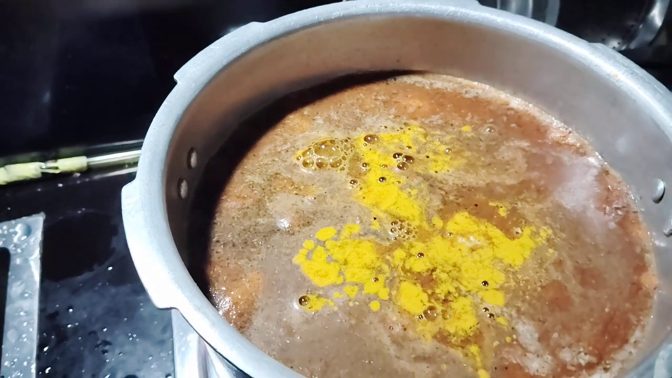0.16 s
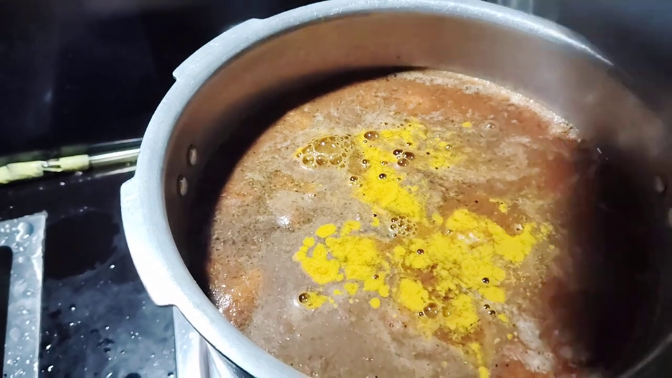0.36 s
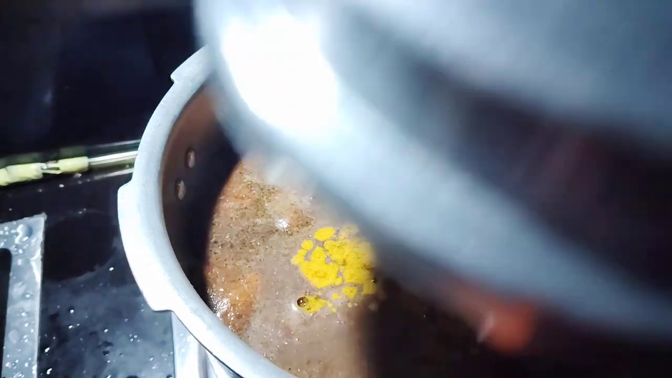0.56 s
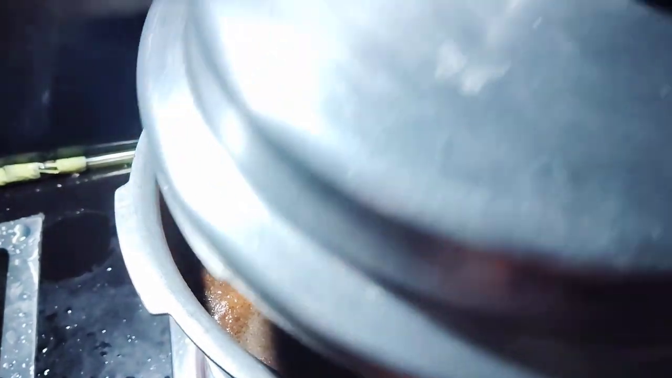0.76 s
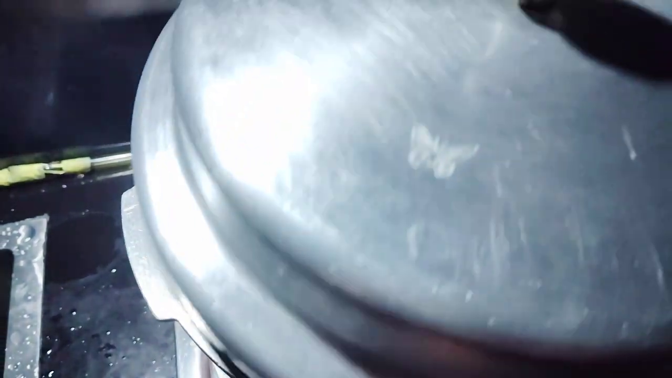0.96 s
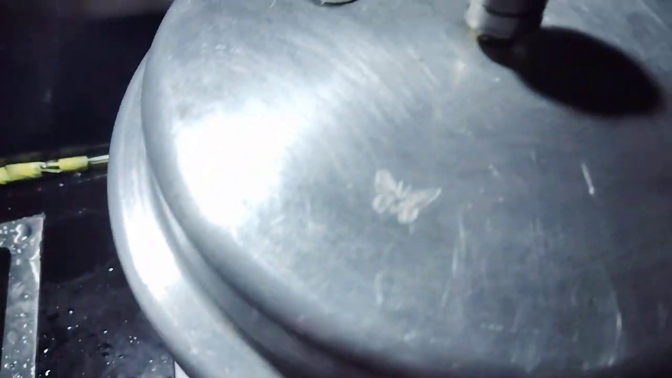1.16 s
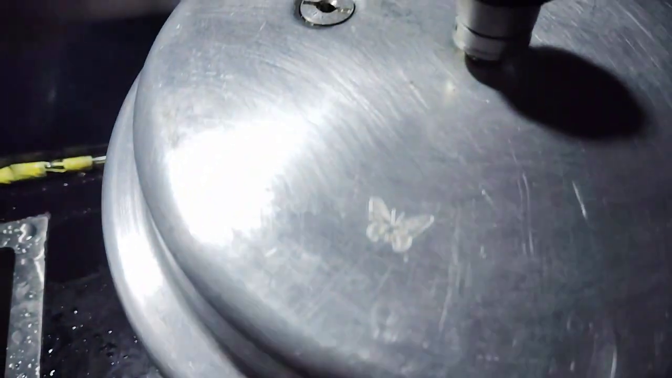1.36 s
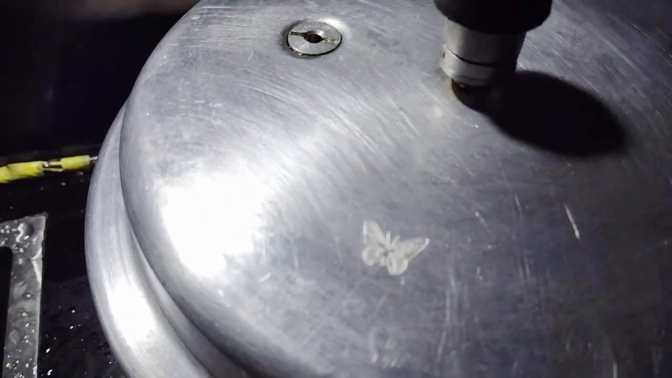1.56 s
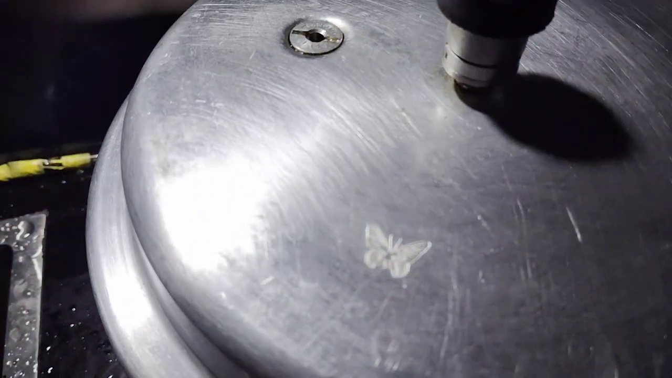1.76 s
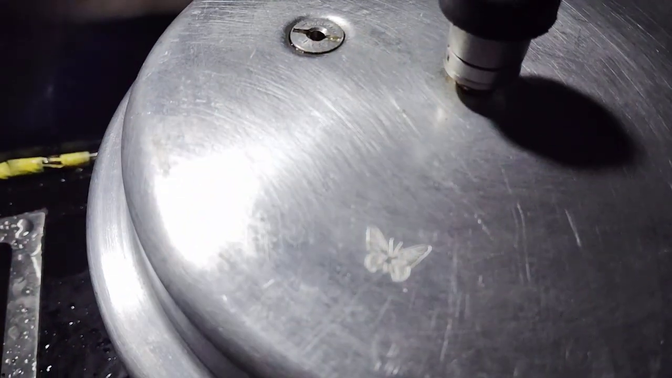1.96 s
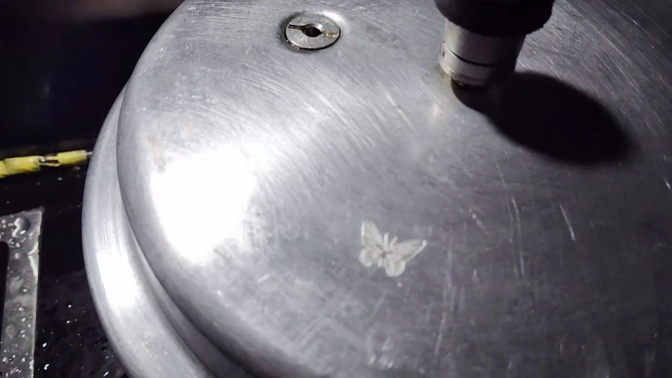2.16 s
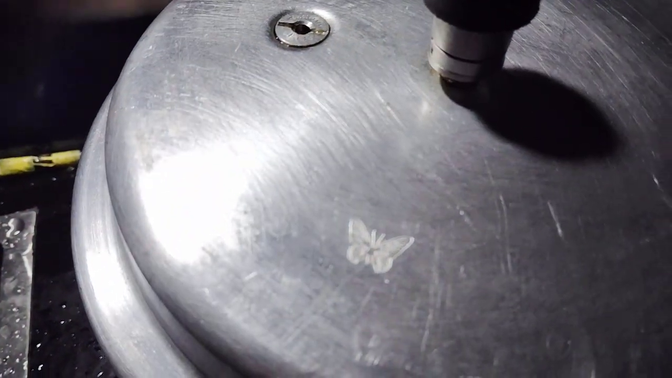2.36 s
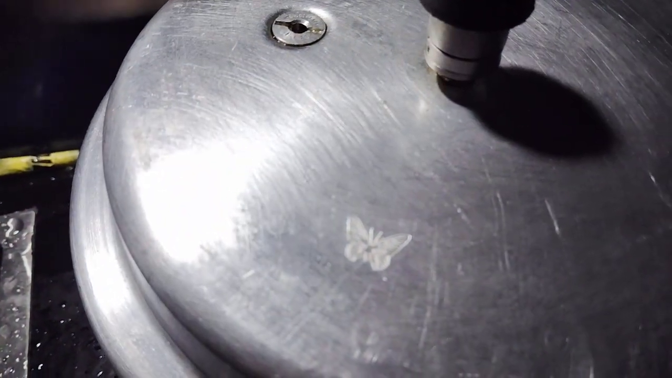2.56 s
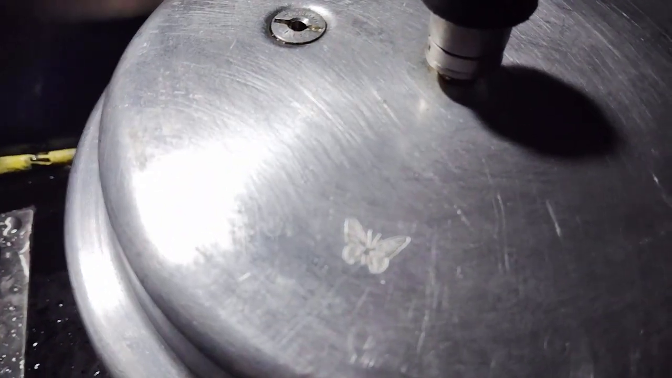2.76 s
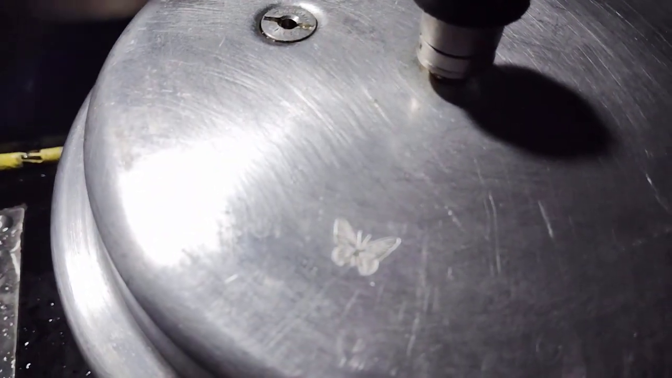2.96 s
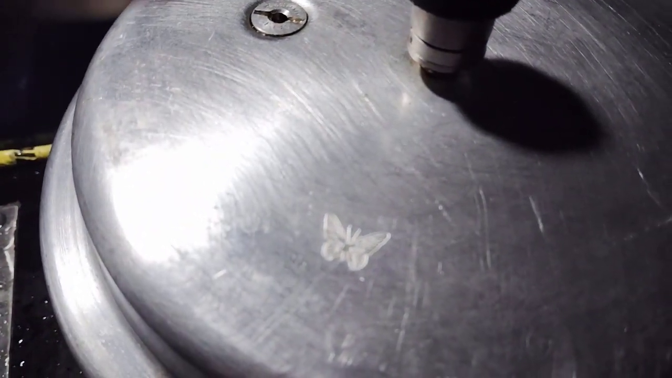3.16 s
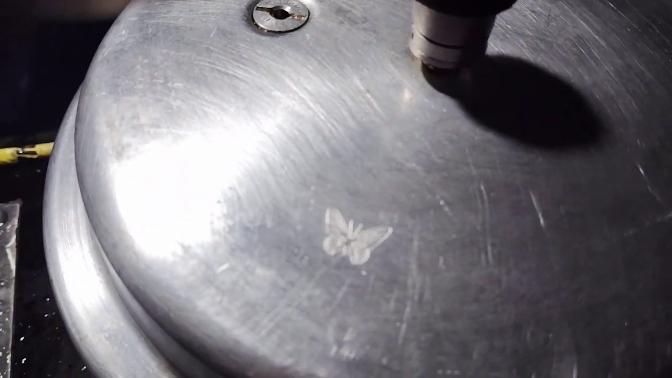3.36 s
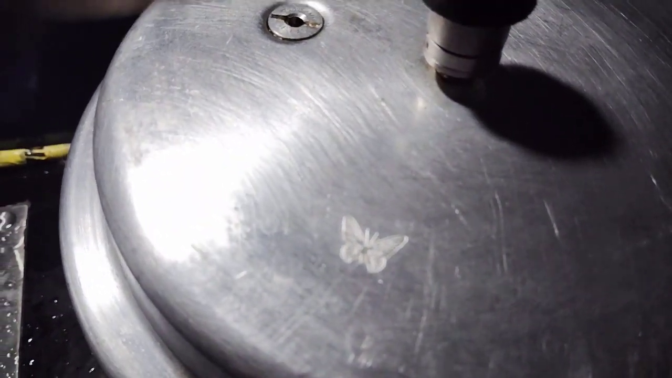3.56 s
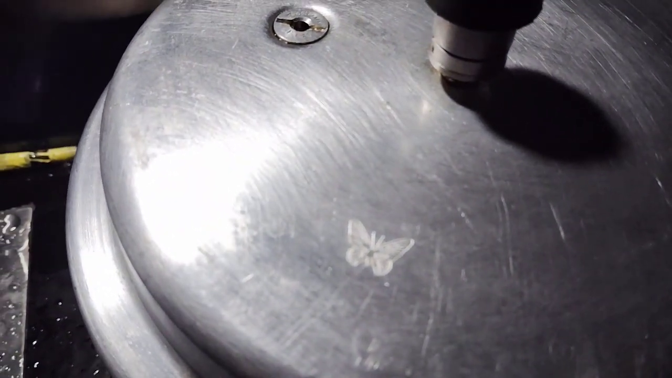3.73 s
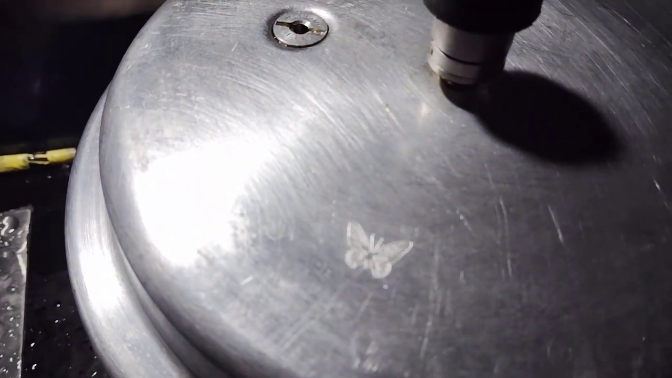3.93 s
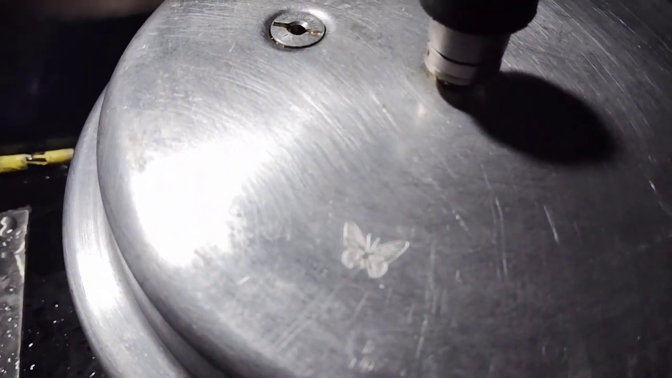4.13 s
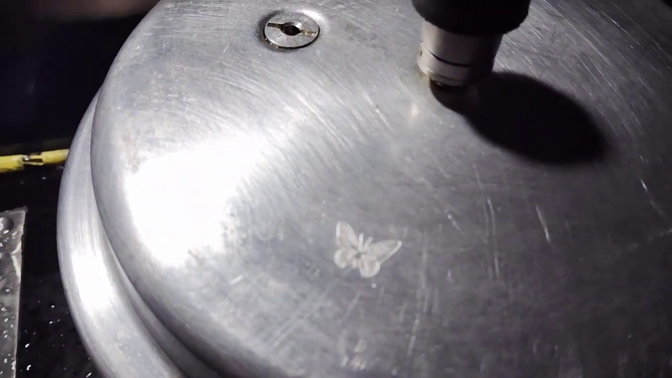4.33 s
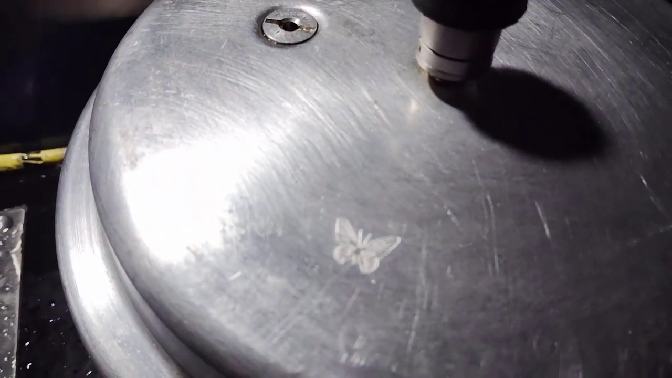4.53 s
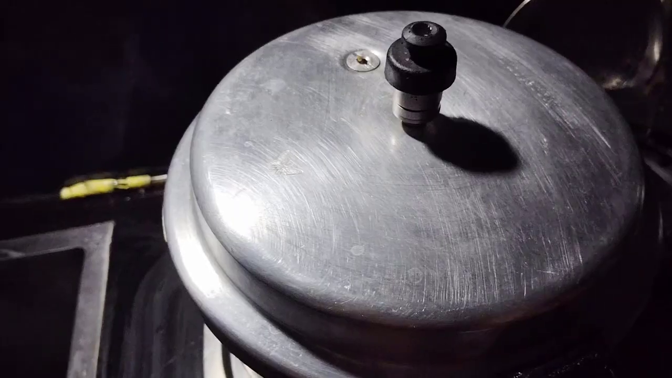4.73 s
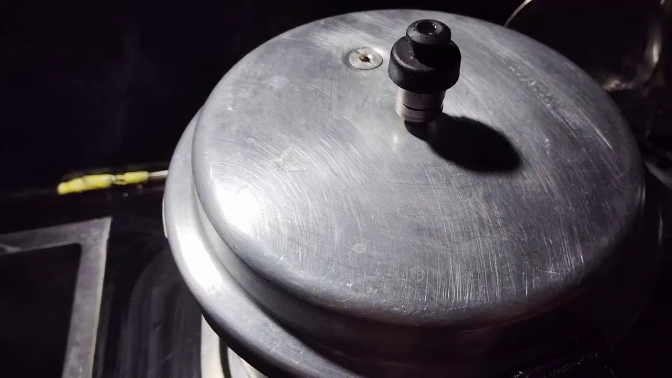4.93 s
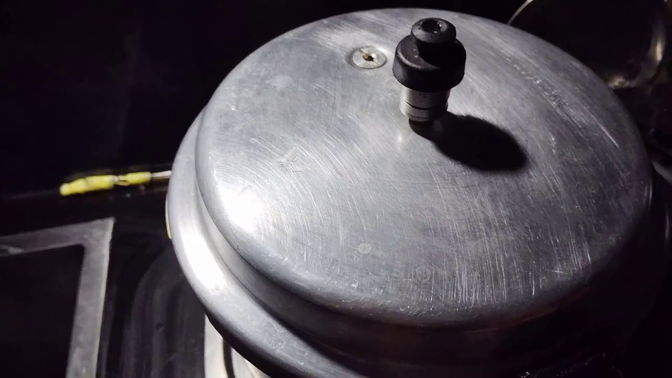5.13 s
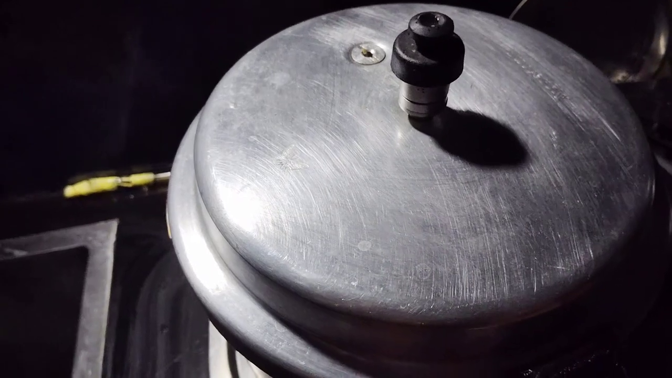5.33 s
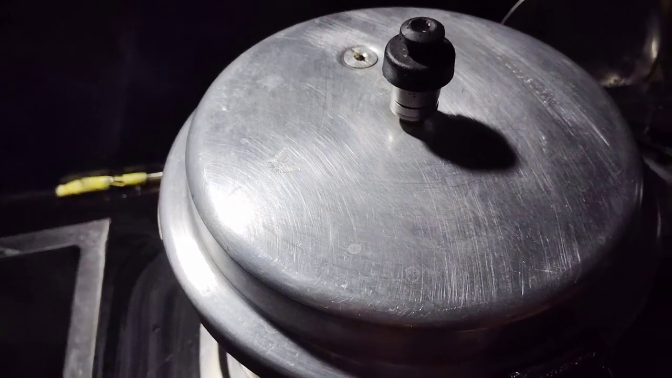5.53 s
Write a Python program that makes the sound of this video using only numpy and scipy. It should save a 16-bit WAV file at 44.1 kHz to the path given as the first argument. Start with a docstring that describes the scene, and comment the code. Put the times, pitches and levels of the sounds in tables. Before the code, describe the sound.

A close microphone in a kitchen catches a pot simmering quietly, with low flame murmur, soft fizz and occasional pitched bubble plops. A dull, booming knock, like a drip into a steel sink, dies away at the very start and sounds again at 0.36 seconds. At 1.03 an aluminium lid strikes the rim with a sharp, rapidly chattering clank, rocks with light taps and low rubbery groaning, then drops at 1.4 with a longer, more ringing clank. From 1.76 to about 2.2 a click starts a bright, grainy scrape as it twists shut, ending in small clicks, with another knock at 2.06. The simmer grows gurglier and more sputtery, a faint tap comes near 2.9, and hollow knocks fall at 3.17, 3.57 and 4.1. A bubbling surge is cut off at 4.28. After about a third of a second of silence, a much quieter wavering hum fades in with faint crackle, pings and ticks until the end.

```python
"""Pressure cooker lid shut on a simmering pot

An aluminium lid rocks, drops into its seat with a chattering clank and is twisted shut: rapid contacts excite
noise bands and damped modes, and grainy stick-slip noise drives the rocking and the twist.
The pot hisses and bubbles in coloured noise and short pitched rings; a dull knock, perhaps a tap dripping
into a steel sink, recurs as a falling sine sweep with booming modes. The sound cuts out briefly and
fades back in on the closed pot, humming and ticking quietly."""
import sys
import numpy as np
from scipy import signal
from scipy.fft import rfft, irfft, next_fast_len
from scipy.io import wavfile

SR = 44100
rng = np.random.default_rng(int(sys.argv[2]) if len(sys.argv) > 2 else 0)


def waveform_to_disk(signal):
    """Save audio, clipped to [-1, 1], as 16-bit WAV at the path in sys.argv[1]."""
    frames = np.transpose(np.atleast_2d(signal))
    scaled = np.clip(frames, -1, 1) * 32767
    samples = np.round(scaled).astype(np.int16)
    wavfile.write(sys.argv[1], SR, samples)


N = 246735
TIME = np.arange(N) / SR
AGE = TIME[:SR]  # seconds since a blow, up to one second
CUT_S = 4.277  # the sound cuts out here

# Main modes of lid and pot. Each row: pitch in Hz, level in dB, t60 in seconds.
LID_MODES = [(113.4, -12, .93), (228.5, -4.5, .25), (253, -3.5, .25), (289.6, -8.5, 0.24), (362, 1, .21),
             (501.3, -1, 0.24), (555, -7, .23), (636, -1.5, 0.25), (716, -4, .15), (738, -4, .13),
             (846, -3, .2), (921, -8.5, .13), (1130, -7.5, .2), (1276, -12, .2), (1444, -3.5, .14),
             (1638, -12, .19), (1802, -10.5, 0.17), (1856, -13, .15), (2115, -16, .22)]
# Spectrum of the crowded higher modes of the dome. Each row: frequency in Hz, level in dB.
CLACK = [(70, -37), (130, 1), (300, -3.5), (700, -1.5), (1000, -5.5), (1400, -6), (2000, -7), (2600, -18),
         (3400, -19.5), (6000, -29.5), (16000, -53.5)]
# Spectrum of the lugs scraping and catching. Each row: frequency in Hz, level in dB.
LUGS = [(900, -3.5), (2400, -2), (3050, 2.5), (3450, 1), (3900, -3), (5100, -10.5), (5550, -1.5),
        (6100, -7), (7200, -15), (8100, -5), (8900, 0.5), (10400, -0.5), (12500, -4.5), (16000, -13)]
# The lid lands and chatters. Each row: start in seconds, first rebound gap in seconds, chatter length in
# seconds, force in dB, time to full weight in seconds, force lost in dB per second, rim ring in dB,
# bright edge in dB.
LANDINGS = [(1.0331, .0044, .018, 3.5, 0.0038, 1598.5, -9.5, -5.5),
            (1.4008, .0045, .0265, 3, 0.000086, 370, -3.5, -6.5)]
# The lid taps the rim lightly. Each row: start in seconds, force in dB.
TAPS = [(1.134, -21.5), (1.194, -20), (1.333, -20), (1.344, -16.5), (1.352, -15), (2.876, -23)]


def amp(db):
    """Decibels to gain."""
    return 10 ** (np.asarray(db) / 20)


def unit(x):
    """Scale to rms 1."""
    return x / np.sqrt(np.mean(x ** 2))


def colour(x, points):
    """Filter a signal by a curve of (Hz, dB) points, then scale it to rms 1."""
    hz, db = np.transpose(points)
    size = next_fast_len(len(x))
    f = np.maximum(np.fft.rfftfreq(size, 1 / SR), 1)
    gain = amp(np.interp(np.log(f), np.log(hz), db))
    return unit(irfft(rfft(x, size) * gain, size)[:len(x)])


def noise(points, size=N):
    """Coloured noise at rms 1."""
    return colour(rng.standard_normal(size), points)


def grains(spread_db):
    """Dense micro-impacts of very unequal size: noise whose level jumps every 32 samples."""
    sizes = np.minimum(rng.exponential(size=N // 32 + 1), 6)
    return rng.standard_normal(N) * amp(spread_db * np.repeat(sizes, 32)[:N])


def fade(t60):
    """Free exponential decay after a blow, down 60 dB after t60 seconds."""
    return np.exp(-np.log(1000) * AGE / t60)


def ring(modes):
    """Damped sine modes of (Hz, dB, t60 s); neighbours swing in opposite directions."""
    total = 0
    for k, (hz, db, t60) in enumerate(modes):
        total = total + (-1) ** k * amp(db) * fade(t60) * np.sin(2 * np.pi * hz * AGE)
    return total


def overtones(count=170):
    """The many higher modes of a thin dome, as undamped sines scattered between 0.9 and 15 kHz."""
    hz = 900 + 14100 * rng.random((count, 1)) ** 2
    turn = rng.random((count, 1))  # start phase in cycles
    return np.sin(2 * np.pi * (hz * AGE + turn)).sum(axis=0)


def walk(rate):
    """Slow random drift: straight lines between normal random knots, rate knots per second."""
    knots = rng.standard_normal(512)
    return np.interp(TIME * rate, np.arange(len(knots)), knots)


def swell(start, length, attack, release_t60):
    """Gain over time: rise, hold, then a free decay."""
    rise = np.clip((TIME - start) / attack, 0, 1)
    overrun = np.maximum(TIME - start - length, 0)
    return rise * np.exp(-np.log(1000) * overrun / release_t60)


def add(out, s, sound):
    """Mix a sound in at time s; one that starts before zero loses its beginning."""
    i = int(s * SR)
    sound, i = sound[max(-i, 0):], max(i, 0)
    out[i:i + len(sound)] += sound[:N - i]


def lid(clack_db=-19, clack_rise_s=.0003, clack_t60=.026, dent_db=-8, dent_t60=0.0067,
        rim_db=-19.0, edge_db=-21, edge_t60=0.024, dome_tail_db=-23, dome_t60=0.34,
        rim_tail_db=-21, rim_t60=0.28, edge_tail_db=-20, edge_tail_t60=0.18, room_db=-25, room_t60=0.65):
    """Every contact dents and clacks the dome and zings the edge; quick rebounds make the clank."""
    # Crowded modes of the rim. Each row: frequency in Hz, level in dB.
    rim_band = [(1200, -24), (2400, 6.5), (2800, -6), (3500, -8.5), (4200, 9.5), (4700, -8.5), (5300, -1),
                (6500, -20.5), (8000, -21), (16000, -44.5)]
    # Zing of the edge. Each row: frequency in Hz, level in dB.
    edge_band = [(2000, -33), (4500, -17), (7200, -4), (8100, -13), (8350, 4.5), (9100, 4.5), (10000, -5),
                 (11500, -9.5), (13200, -8), (16000, -20)]
    out, shimmer = np.zeros(N), overtones()
    dome_ring = amp(dome_tail_db) * colour(shimmer, CLACK) * fade(dome_t60)
    rim_ring = amp(rim_tail_db) * colour(shimmer, rim_band) * fade(rim_t60)
    edge_ring = amp(edge_tail_db) * colour(shimmer, edge_band) * fade(edge_tail_t60)
    spread = 1 - np.exp(-AGE / clack_rise_s)  # the blow takes a moment to spread over the dome
    clack_decay = fade(clack_t60) + amp(room_db) * fade(room_t60)
    for s, force_db, ring_db, high_db, dent_hz in contacts():
        dent = ring([(dent_hz, dent_db, dent_t60)])  # the sheet gives way and springs back
        clack = amp(clack_db) * spread * (noise(CLACK, SR) * clack_decay + dome_ring)
        rim = noise(rim_band, SR) * fade(edge_t60) + rim_ring
        edge = noise(edge_band, SR) * fade(edge_t60) + edge_ring
        blow = amp(force_db) * (dent + clack)
        add(out, s, blow + amp(rim_db + ring_db) * rim + amp(edge_db + high_db) * edge)
    return out


def contacts(tap_rim_db=-22, tap_edge_db=-34, tap_hz=1200, count=12):
    """Yield touches (s, force dB, rim dB, edge dB, dent Hz): rebounds come ever faster, with deeper dents."""
    rebound = .92  # each gap as a share of the one before
    glance_db = -10  # a touch before full weight only grazes: dB per first gap still to go
    bite_s, bite_db = .002, -13  # the edge starts duller; twice the time to full weight adds to bite_s
    # the dent's pitch falls as more of the rim touches
    dent_first_hz, dent_seated_hz, seating_s = 1320, 620, 0.011
    rim_follows = 0.79  # share of the change in force that the rim ring follows
    for s, gap, length, db, weight_s, loss_db_per_s, rim_db, edge_db in LANDINGS:
        lags = np.append(0, np.cumsum(gap * rebound ** np.arange(count)))
        for lag in lags[lags < length]:
            graze_db = glance_db * max(weight_s - lag, 0) / gap
            change_db = graze_db - loss_db_per_s * max(lag - weight_s, 0)
            dull_db = bite_db * max(1 - lag / (bite_s + 2 * weight_s), 0)
            dent_hz = dent_seated_hz + (dent_first_hz - dent_seated_hz) * np.exp(-lag / seating_s)
            yield s + lag, db + change_db, rim_db + rim_follows * change_db, edge_db + dull_db, dent_hz
    for s, db in TAPS:
        yield s, db, db + tap_rim_db, db + tap_edge_db, tap_hz


def ringing(body_db=-24.0, rim_db=-25, tap_db=-27, build_share=.3):
    """Main modes of pot and rim build up while the lid chatters, the more the longer it does, then ring out."""
    # Modes of the thin rim. Each row: pitch in Hz, level in dB, t60 in seconds.
    rim_modes = [(2238, -12, .28), (2420, -12, .26), (2840, -10, .15), (3980, -16, .31), (4196, -3, .15),
                 (4403, 0, .16), (5254, -10, .1), (7284, -20, .2), (8680, -13, .17), (8882, -8, .21),
                 (9125, -9, .18), (9814, -15, .16), (12580, -17, .15)]
    out, body, rim = np.zeros(N), ring(LID_MODES), ring(rim_modes)
    longest = max(row[2] for row in LANDINGS)
    for s, _, length, db, _, _, ring_db, _ in LANDINGS:
        build = (length / longest) ** 2 * (1 - np.exp(-AGE / (build_share * length)))
        add(out, s, build * (amp(body_db + db) * body + amp(rim_db + ring_db) * rim))
    for s, db in TAPS:
        add(out, s, amp(tap_db + db) * body)
    return out


def rubbing(spread_db=2, groan_db=-3, scrape_db=-4, rasp_db=-2.0, sing_db=-4.5, sing_t60=0.076):
    """Stick and slip: the rocking gasket drives the lid's low modes; the lugs rasp and make the rim sing."""
    # Slips of the rubber gasket. Each row: frequency in Hz, level in dB.
    gasket = [(80, -39.5), (115, 0), (170, -6.5), (225, 3.5), (270, -2.5), (400, -15.5), (520, -8.5),
              (640, -11), (800, -21.5), (1300, -19.5), (1700, -20.5), (2600, -37), (8000, -53)]
    # The lid rocks on its gasket. Each row: start in seconds, length in seconds, level in dB.
    rocks = [(1.05, 0.079, -43), (1.138, .036, -35.5), (1.192, .075, -37.5), (1.32, 0.15, -30)]
    slips = colour(grains(spread_db), gasket)
    groan = unit(signal.fftconvolve(slips, ring(LID_MODES))[:N])
    rocking = sum(amp(db) * swell(s, length, attack=.015, release_t60=0.11) for s, length, db in rocks)
    rasp = colour(grains(spread_db), LUGS)
    sing = unit(signal.fftconvolve(rasp, overtones(count=90) * fade(sing_t60))[:N])
    # one turn slides the lugs under the rim
    twist = amp(-50.5) * swell(start=1.762, length=0.43, attack=.018, release_t60=1)
    rocked = (amp(groan_db) * groan + amp(scrape_db) * slips) * rocking
    twisted = (amp(rasp_db) * rasp + amp(sing_db) * sing) * twist
    return rocked + twisted


def clicks(tail_db=-23, tail_t60=0.2, skirt_db=-16):
    """Lugs catch and warm metal ticks: decaying noise, each around its own pitch."""
    # Light metal clicks. Each row: start in seconds, level in dB, t60 in seconds, centre of the ring in Hz.
    click_rows = [(0.529, -52.5, 0.18, 6050), (1.0735, -31, .014, 9550), (1.764, -32.5, 0.049, 7540),
                  (2.018, -42, 0.046, 9300), (2.185, -42, .03, 5140), (2.214, -41.5, 0.018, 3500),
                  (4.779, -50.5, 0.017, 3500), (4.835, -56, .03, 8500), (5.035, -59, 0.12, 8500),
                  (5.443, -55.5, 0.11, 10100)]
    out = np.zeros(N)
    for s, db, t60, hz in click_rows:
        metal = colour(noise(LUGS, SR), [(hz / 4, skirt_db), (hz, 0), (hz * 4, skirt_db)])
        add(out, s, amp(db) * metal * (fade(t60) + amp(tail_db) * fade(tail_t60)))
    return out


def knocks(wave_db=-25.0, ring_db=-35, ring_lag_s=0.01478, tap_db=-46, tap_t60=0.22,
           ping_hz=700, ping_db=-36, ping_t60=0.035, ping_lag_s=0.00323):
    """A bending wave in a thin sheet: the treble arrives first, the bass follows and booms on."""
    # Dull knocks, the first already dying away. Each row: start in seconds, level in dB.
    knock_rows = [(-.06, -7), (0.3602, 1), (2.061, -1), (3.1696, -1), (3.5746, -0.5), (4.1053, -1.5)]
    # Booming modes of the sink. Each row: pitch in Hz, level in dB, t60 in seconds.
    sink_modes = [(114.36, -0.5, 0.75), (137, -13, .45), (224.8, 1, 0.24), (275, -11, 0.38),
                  (375, -12, 0.1)]
    extra_hz, end_hz, glide_s = 1400, 240, .0021  # extra pitch at first, last pitch, glide time
    peak_s, width_s = .0118, .0066  # when the wave peaks and how wide the peak is
    hz = end_hz + extra_hz * np.exp(-AGE / glide_s)
    bump = np.exp(-((AGE - peak_s) / width_s) ** 2)
    wave = amp(wave_db) * np.sin(2 * np.pi * np.cumsum(hz) / SR) * bump
    ping = ring([(ping_hz, ping_db, ping_t60)])
    out, boom = np.zeros(N), amp(ring_db) * ring(sink_modes)
    for s, db in knock_rows:
        tap = amp(tap_db) * noise(CLACK, SR) * fade(tap_t60)
        add(out, s, amp(db) * (wave + tap))
        add(out, s + ping_lag_s, amp(db) * ping)
        add(out, s + ring_lag_s, amp(db) * boom)
    return out


def bubbles(rise_s=0.00046, splash_db=-3, tone_db=-3):
    """Each bubble starts with a rough splash and rings out at one pitch."""
    # Bubbles, drops and small pings. Each row: start in seconds, pitch in Hz, level in dB, t60 in seconds.
    bubble_rows = [(0.511, 1776, -39.5, 0.059), (0.75, 418, -33, 0.054), (0.814, 1202, -43.5, 0.086),
                   (2.11, 378, -31.5, 0.098), (2.867, 2387, -44, 0.11), (3.611, 2455, -38.5, 0.063),
                   (3.79, 1505, -38.5, 0.5), (3.942, 315, -37, 0.061), (4.228, 2380, -41.5, 0.091),
                   (4.233, 340, -27, 0.059), (4.609, 1587, -46.5, 0.25), (4.922, 1840, -55, 0.28),
                   (4.924, 670, -50, 0.22), (5.24, 1302, -54, 0.41), (5.447, 3930, -60, 0.12)]
    out = np.zeros(N)
    for s, hz, db, t60 in bubble_rows:
        band = [(hz / 4, -60), (hz * .8, -15), (hz, 0), (hz * 1.25, -15), (hz * 4, -60)]
        splash = amp(splash_db) * noise(band, SR) * fade(t60)  # fades twice as fast as the tone
        tone = amp(tone_db) * np.sin(2 * np.pi * hz * AGE)
        add(out, s, amp(db) * (tone + splash) * fade(t60) * (1 - np.exp(-AGE / rise_s)))
    return out


def simmer(rumble_share=0.16, hiss_share=.03, sputter_db=-69):
    """The flame murmurs under the pot; as the boil grows, froth gurgles up and the fizz gains a sputter."""
    # Spectra of the murmur, froth, fizz and sputter. Each row: frequency in Hz, level in dB.
    murmur_band = [(40, 4), (80, -12.5), (113, 6), (166, -8), (255, -1), (313, -7), (354, -4.5), (477, -10),
                   (964, -15), (1250, -19.5), (1580, -11), (2160, -34), (4000, -34.5), (8000, -59)]
    froth_band = [(700, -17.5), (1400, -2.5), (1650, 9.5), (2000, 6), (2500, 1.5), (3100, -27), (6000, -36)]
    hiss_band = [(1200, -21.5), (1700, -7.5), (2400, -5), (3200, -3.5), (4700, -7), (6200, -5.5),
                 (8000, -7.5), (8600, 0.5), (10000, -1), (11400, -4.5), (12200, -7.5), (16000, -12)]
    sputter_band = [(3000, -31), (5200, -16.5), (6300, -3.5), (8000, 1), (10500, -2), (16000, -15)]
    # Surges of the froth. Each row: peak in seconds, half width in seconds, rise in dB.
    surges = [(.29, 0.023, 3), (2.87, 0.076, 4), (4.234, 0.028, 5.5)]
    rumble_db, froth_db, hiss_db = -48, -63.5, -56
    heating_s, boil_db_per_s = 2.43, 5.5  # from here the boil grows as the pot heats up
    boil_db = boil_db_per_s * np.maximum(TIME - heating_s, 0)
    for s, width, db in surges:
        boil_db = boil_db + db * np.exp(-((TIME - s) / width) ** 2)
    flicker = amp(.6 * walk(14))
    rumble = noise(murmur_band) * amp(rumble_db + rumble_share * boil_db) * flicker
    froth = colour(grains(spread_db=0.0), froth_band) * amp(froth_db + boil_db)
    fizz = colour(grains(spread_db=2.02), hiss_band) * amp(hiss_db + hiss_share * boil_db)
    sputter = colour(grains(spread_db=3.2), sputter_band) * amp(sputter_db + boil_db)
    return rumble + froth + fizz + sputter


def closed_pot(hum_db=-52, crackle_db=-58.5):
    """With the lid on, a hum of low noise and a faint grainy crackle remain and waver together."""
    # Spectra of the hum and the crackle. Each row: frequency in Hz, level in dB.
    hum_band = [(20, -11), (70, -17), (95, -21), (115, 6), (132, 0), (155, -13), (220, -42)]
    crackle_band = [(100, -31), (170, -19), (230, 1.5), (263, -11), (295, -2), (330, -12), (553, -16),
                    (700, -15.5), (1120, -22), (1600, -20.5), (3180, -28), (6500, -46), (9500, -27.5),
                    (16000, -46)]
    waver = amp(1.0 * walk(10))
    hum = amp(hum_db) * noise(hum_band)
    crackle = amp(crackle_db) * colour(grains(spread_db=1), crackle_band)
    return waver * (hum + crackle)


def scene():
    """Sum of all sources; at the cut the simmer gives way to the quiet hum and crackle."""
    stove = np.where(TIME < CUT_S, simmer(), closed_pot())
    return (lid() + ringing() + rubbing() + clicks() + knocks() + bubbles() + stove)[None]


def record(dry, fade_in_s=0.19, low_cut_hz=90, bass_leak_db=-22):
    """The microphone weakens the deep bass; a short silence, a fade back in, and a steep cut of the top."""
    resume_s, top_hz = 4.6, 15900
    low_cut = signal.butter(8, low_cut_hz, "highpass", fs=SR, output="sos")
    bass_leak = signal.butter(2, low_cut_hz / 2, "lowpass", fs=SR, output="sos")
    top_cut = signal.ellip(10, .2, 80, top_hz, fs=SR, output="sos")
    thin = signal.sosfilt(low_cut, dry)
    deep = signal.sosfilt(bass_leak, dry)
    gate = (TIME < CUT_S) + np.clip((TIME - resume_s) / fade_in_s, 0, 1)
    return signal.sosfilt(top_cut, (thin + amp(bass_leak_db) * deep) * gate)


dry = scene()
out = record(dry)
waveform_to_disk(out)
```